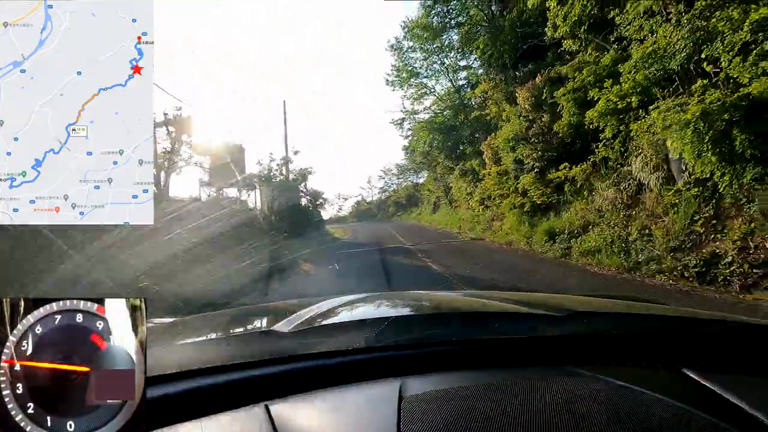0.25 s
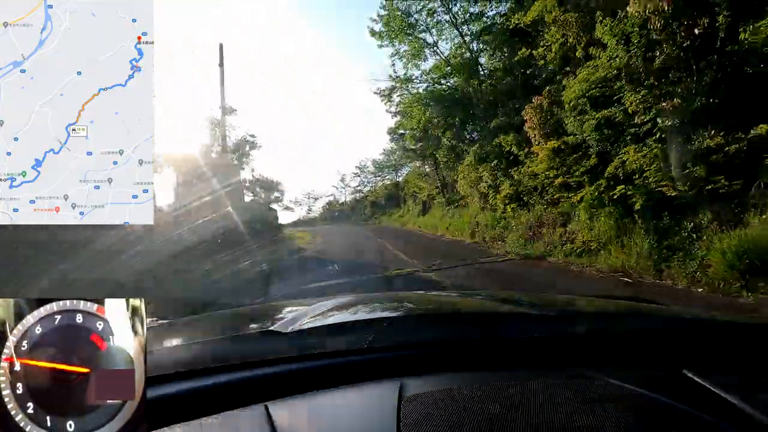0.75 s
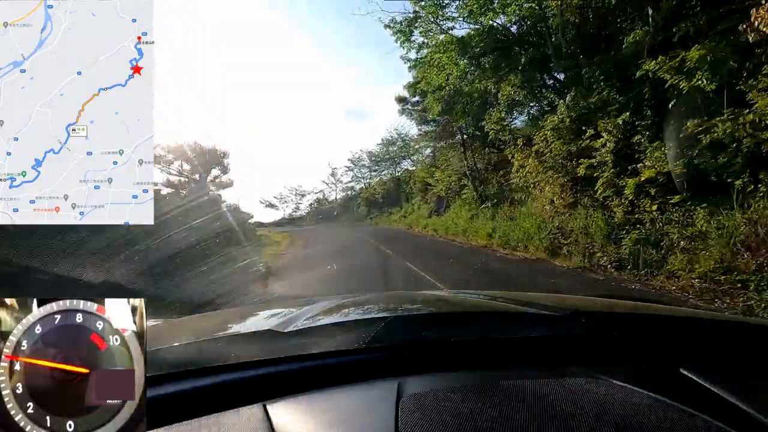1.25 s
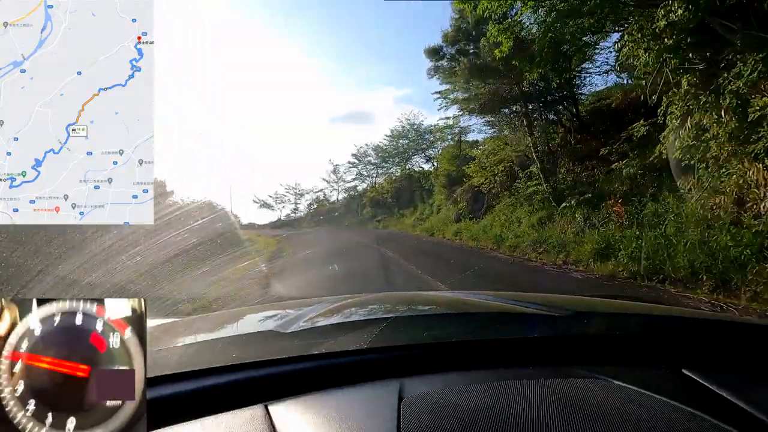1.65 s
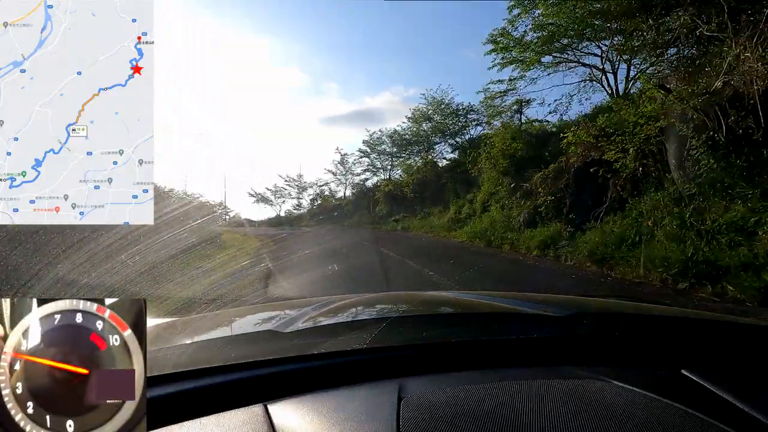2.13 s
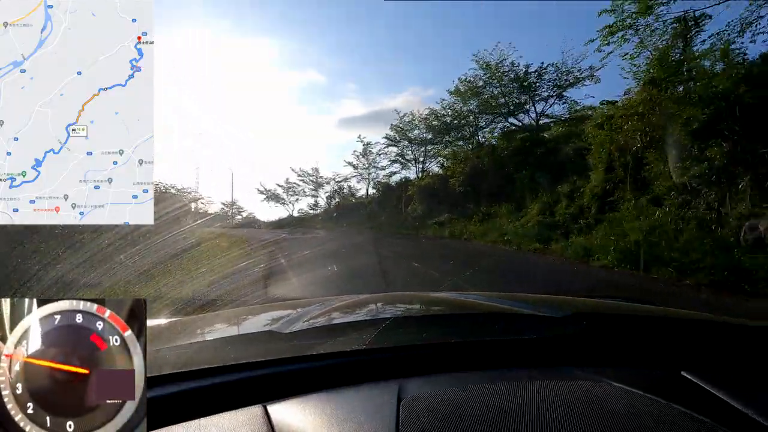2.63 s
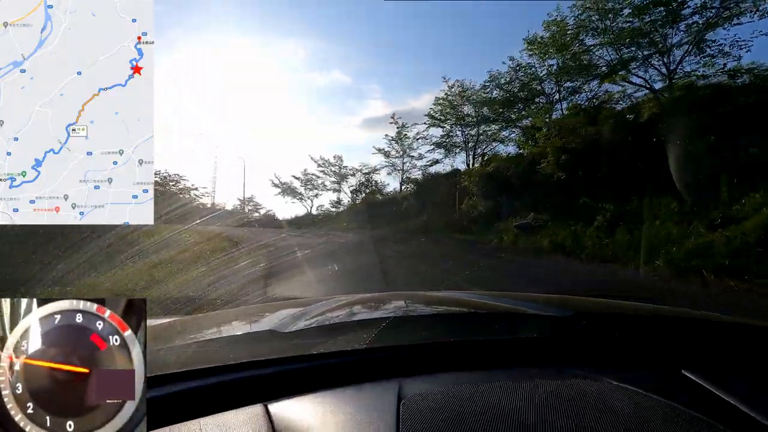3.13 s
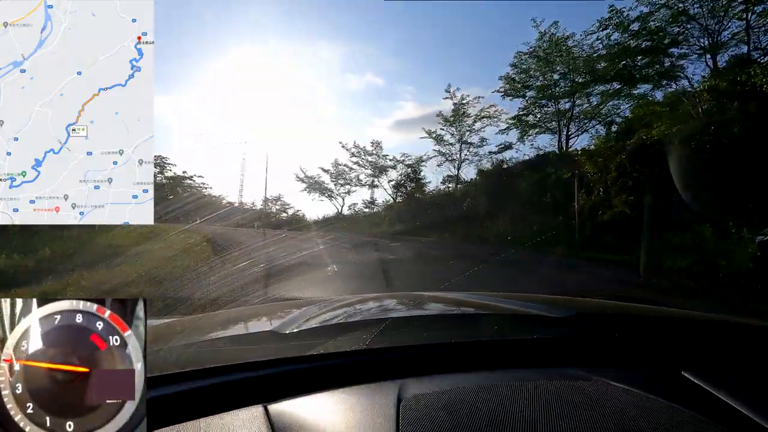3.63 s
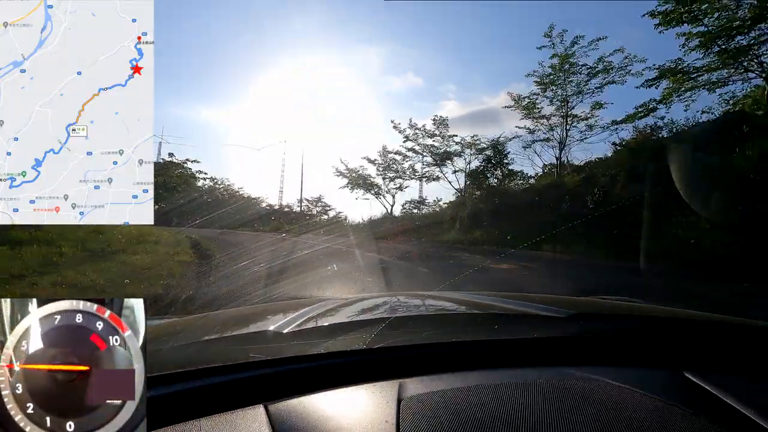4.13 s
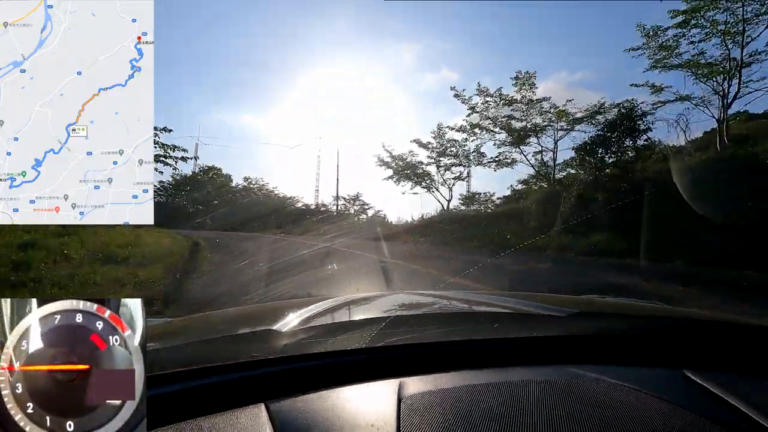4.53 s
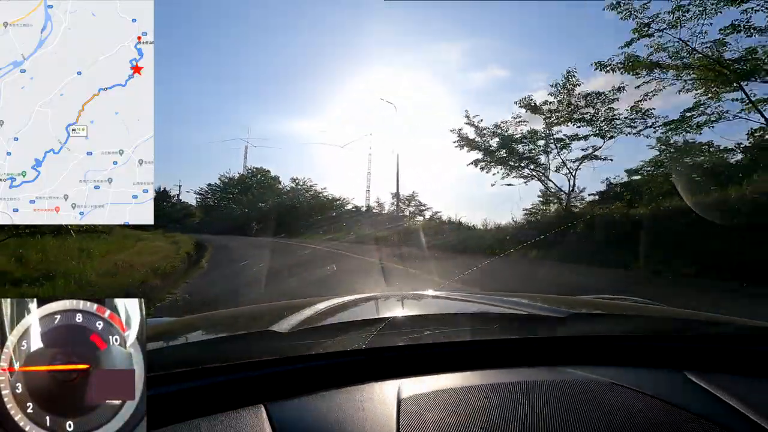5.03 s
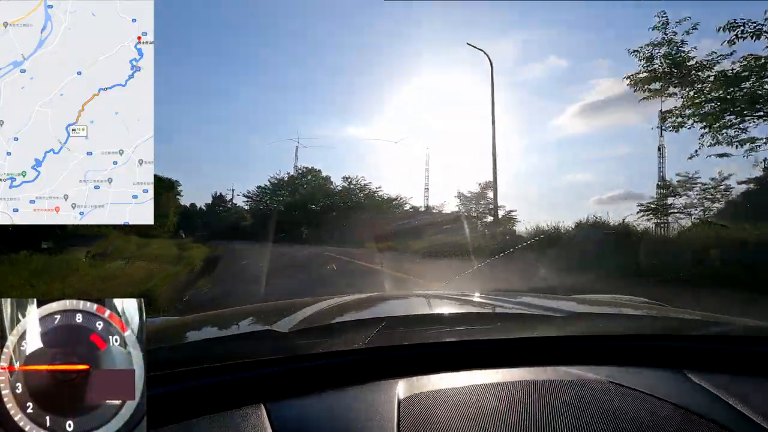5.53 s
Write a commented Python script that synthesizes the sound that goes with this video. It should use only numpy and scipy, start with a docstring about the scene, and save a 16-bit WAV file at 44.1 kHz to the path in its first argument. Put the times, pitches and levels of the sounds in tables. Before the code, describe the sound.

Inside a car on a bumpy road, a raspy engine pulls, backs off and pulls again, with road rumble, plastic knocks and small clinks.

```python
"""Inside a sports car with a twin-rotor engine, climbing a bumpy mountain road.
The driver pulls, eases off for a bend and pulls again from lower revs. Two firings per shaft turn
give an exhaust drone, a series of shaft orders and a pulsed rasp, all following the engine load.
The road excites tyre roar, rumble and the air modes of the cabin and tyres, while loose things
buzz, knock, clink and slide, the struck ones ringing in their own damped modes."""
import sys
import numpy as np
from scipy import signal
from scipy.fft import rfft, irfft
from scipy.io import wavfile
from scipy.ndimage import uniform_filter1d, minimum_filter1d

SR = 44100
rng = np.random.default_rng(int(sys.argv[2]) if len(sys.argv) > 2 else 0)


def int16_out(signal):
    """Quantize to a 16-bit WAV file."""
    q = np.round(np.clip(np.atleast_2d(signal).T, -1, 1) * 32767)
    wavfile.write(sys.argv[1], SR, q.astype(np.int16))


N = 254898
TIME = np.arange(N) / SR
LOW_REVS_HZ, HIGH_REVS_HZ, NEAR_TOP_HZ, TOP_REVS_HZ = 61.5, 65.5, 67.7, 69.7  # shaft speeds
BAND_LIMIT_HZ = 15900

# Rotation of the eccentric shaft. Each row: time in seconds, speed in turns per second.
SHAFT_SPEED = [(0, 64.95), (.65, 67.1), (1.56, 69.9), (1.69, 71.85), (1.82, 69.1), (1.94, 70.55),
               (2.08, 69.8), (2.25, 69.65), (2.8, 67.6), (3.25, 66.7), (3.9, 62.5), (4.32, 61.5),
               (4.45, 59.1), (4.6, 60.4), (4.75, 58.7), (4.96, 60.45), (5.08, 59.55), (5.26, 60.55),
               (5.78, 62.1)]
# The driver's demand. Each row: time in seconds, engine load in dB (0 is pulling hard).
ENGINE_LOAD = [(0, -0.5), (1.6, -1), (2.05, -3.5), (2.42, -9.5), (2.72, -4.5), (3.2, -3), (3.75, -14),
               (4.28, -15.5), (4.66, -3), (4.95, -1.5), (5.33, -0.5), (5.78, -1)]
# Shaft orders. Each entry: frequency as a multiple of shaft speed.
ORDERS = [6, 8, 9, 10, 11, 12, 13, 14, 15, 16, 17, 19, 20, 21, 22, 23, 24, 25, 26, 32]
# Their spectra at high revs, on part throttle and at low revs. Each entry: one order's level in dB.
HIGH_REVS_DB = [-37.5, -41, -36, -47, -35, -32.5, -37.5, -36, -34.5, -44, -38.5, -37.5, -46, -33.5, -39.5,
                -33.5, -46, -60, -60, -52]
PART_THROTTLE_DB = [-30, -44, -28.5, -38, -31, -30.5, -37, -42, -31, -46, -45, -34, -43, -32.5, -38, -42,
                    -45, -60, -60, -53.5]
LOW_REVS_DB = [-40, -33, -47, -22.5, -38, -32, -35.5, -38, -36.5, -36, -35.5, -40, -41, -32.5, -38.5, -33,
               -36.5, -38, -39.5, -53]
# Near top revs the orders slide onto or off cabin resonances. Each entry: one order's change in dB.
TOP_SHIFT_DB = [4, 6, 0, 0, 1, -3.5, -1, 1, -5, -1, 2, 4, 0, -2, -3, -2, -5, 0, 0, 3]
# Spectra of exhaust puffs at high and low revs, intake air, suspension rumble and tyre roar.
# Each row: frequency in Hz, relative spectral density in dB.
PUFFS_HIGH = [(150, 1), (400, -4.5), (550, -6), (700, -2), (900, 5), (1150, -4.5), (1430, 1.5), (1650, -17),
              (2500, -15), (5000, -43.5), (16000, -70.5)]
PUFFS_LOW = [(150, 3), (400, -7), (550, -12), (760, -11), (980, -0.5), (1130, -1.5), (1380, 2.5),
             (1620, -2.5), (1800, -10), (2500, -13.5), (5000, -43.5), (16000, -69.5)]
INTAKE_RUSH = [(400, -9.5), (1000, -0.5), (1500, 3.5), (1800, 4.5), (2300, 1.5), (3000, -4), (4000, -11.5),
               (4700, -18), (6300, -19.5), (9500, -34), (16000, -50)]
RUMBLE = [(6, -50), (15, -26), (24, -10.5), (38, 6), (54, 3.5), (78, 1.5), (100, 2), (125, 5), (160, -4.5),
          (240, -5), (350, -34), (700, -55), (3000, -110)]
TYRE_ROAR = [(80, -9.5), (150, -4.5), (200, -4.5), (245, -1), (300, -1.5), (370, -11), (500, -11),
             (700, -12), (950, -14), (1400, -21), (1900, -28), (2800, -32.5), (4700, -46.5), (8000, -56),
             (16000, -76)]
# Roughness of the asphalt, worst in the bend. Each row: time in seconds, road shake in dB.
ROAD_SHAKE = [(0, -14.5), (.9, -16), (1.35, -14.5), (2, -16.5), (3, -13), (3.5, -11.5), (4.02, -11),
              (4.28, -16.5), (4.45, -12), (4.9, -18.5), (5.45, -17), (5.78, -19)]
# Narrow resonances of the trim. Each row: frequency in Hz, filter width in Hz, rms level in dB.
TRIM_MODES = [(943, 87, -39), (2750, 28, -51), (3975, 250, -58), (6150, 360, -68.5)]
# The buzz of loose bits. Each row: frequency in Hz, relative spectral density in dB.
BUZZ_SPECTRUM = [(3000, -26), (6000, -1), (9000, 2.5), (13000, -2), (16000, -4.5)]
# Hollow plastic knocks and snaps of a catch. Each row: start in seconds, level in dB, pitch factor.
KNOCKS = [(.0398, -2.5, 1), (.1718, 2, 0.97), (.765, -11, 1.6), (1.513, -8.5, 1.1), (2.008, -1.5, .92),
          (2.632, -14, 1.2)]
SNAPS = [(.9326, -10.5, 1), (1.7505, -29, 0.98), (2.9885, -24, 1.05)]
# Modes of the plastic part, the catch and a small hard object.
# Each row: frequency in Hz, relative level in dB, time to decay by 60 dB in seconds.
PLASTIC_MODES = [(680, -12, 0.02), (945, -2, 0.032), (1125, -1, 0.016), (1362, -7, 0.03), (2170, -16, .01),
                 (2900, -15, 0.009), (3630, -19, .008), (4230, -24.5, .008)]
CATCH_MODES = [(3400, -7.5, 0.011), (3900, -8.5, .009), (5640, -3, .0035), (7400, -5, 0.0036),
               (8600, -5, .0035), (12000, -11, .002)]
HARD_OBJECT_MODES = [(2500, -6, .018), (3130, -3, .035), (3510, 0, .025), (3800, 1, .015), (4230, 2, .03),
                     (6350, -12, .025), (6934, -17, .05), (8150, -26, .06)]
# Small things clinking; the row at 0.172 s is the sharp crack that opens the knock there. Each row: start in
# seconds, level in dB, band centre in Hz, half width in octaves, time to decay by 60 dB in seconds.
CLINKS = [(.143, -45, 8000, 0.557, .089), (.172, -25, 3600, 0.7, 0.012), (.631, -41, 7480, 0.41, .12),
          (.709, -36, 12010, 1, 0.1236), (0.8915, -36, 12980, 0.27, .077), (0.9318, -25, 5500, 0.73, 0.026),
          (1.5585, -26, 5700, .35, .02), (1.720, -41, 9500, .6, 0.05), (2.67, -53, 8000, .7, .1),
          (2.872, -43, 10000, 0.797, 0.1157), (2.9855, -30, 6200, 0.63, 0.033),
          (3.335, -36, 3750, 0.18, 0.21), (3.334, -36.5, 7140, 0.29, 0.26), (3.3335, -39, 12000, .4, 0.14),
          (3.448, -35, 2800, .35, .16), (3.617, -31, 2000, .45, .09), (3.7519, -42, 9000, 0.569, .035),
          (4.1359, -48, 7087, .7, 0.086), (4.3, -44, 3700, 0.27, 0.33), (4.4545, -39.5, 5000, 0.38, .039)]
# Bumps set the cabin booming; ridges in the bend set the air in the tyres humming.
# Each row: start in seconds, length in seconds, level in dB, frequency in Hz.
CABIN_BOOMS = [(.18, 0.14, -16, 59.8), (.9, 0.1, -15, 52), (1.37, 0.15, -14, 35), (1.595, .18, -11.5, 62),
               (3.58, 0.059, -8, 48), (3.69, 0.098, -12.5, 54), (3.795, 0.2, -8, 62.7),
               (4.015, 0.17, -5.5, 60.1), (4.14, 0.081, -12, 37.9), (4.395, 0.052, -10.5, 56),
               (4.61, 0.067, -12, 58.3), (5.24, 0.29, -20, 56)]
TYRE_HUMS = [(2.82, 0.096, -18.5, 202), (3.07, 0.11, -19, 252), (3.35, .15, -20.5, 236),
             (3.55, 0.096, -15.5, 236), (3.92, 0.09, -19.5, 245)]
# A scrape as it starts and as it ends. Each row: frequency in Hz, relative spectral density in dB.
SCRAPE_START = [(1500, 2), (3300, 7), (4200, 6), (4900, -3), (6500, -5), (9700, -19), (10600, -24),
                (16000, -25)]
SCRAPE_END = [(1500, 3.5), (3900, 3.5), (5000, -9), (6800, -3.5), (9900, -7.5), (10500, -19), (12500, -17),
              (16000, -24)]
# The hard object lands. Each row: start in seconds, level in dB.
LANDINGS = [(1.5583, -21), (3.336, -25.5)]


def amp(db):
    """Amplitude ratio for a level in decibels."""
    return 10 ** (np.asarray(db) / 20)


def unit(x):
    """Normalisation to rms 1."""
    return x / np.sqrt(np.mean(x ** 2) + 1e-20)


def curve(rows):
    """Linear interpolation of a time table at every sample."""
    return np.interp(TIME, *np.transpose(rows))


def colour(x, spectrum):
    """Filtering in the frequency domain, normalised to rms 1."""
    hz, db = np.transpose(spectrum)
    f = np.fft.rfftfreq(len(x), 1 / SR)
    gain = amp(np.interp(np.log(f + 1), np.log(hz), db))
    return unit(irfft(rfft(x) * gain, len(x)))


def noise(spectrum):
    """Gaussian noise shaped to a spectrum."""
    return colour(rng.standard_normal(N), spectrum)


def wander(rate_hz):
    """Random modulation: low-pass noise of rms 1."""
    f = np.fft.rfftfreq(N, 1 / SR)
    return unit(irfft(rfft(rng.standard_normal(N)) * np.exp(-.5 * (f / rate_hz) ** 2), N))


def add(mix, start_s, sound):
    """Superposition of a sound from a given time on."""
    part = mix[max(round(start_s * SR), 0):][:len(sound)]
    part += sound[:len(part)]


def share(speed, from_hz, to_hz):
    """Linear crossfade weight, 0 to 1 between two shaft speeds."""
    return np.clip((speed - from_hz) / (to_hz - from_hz), 0, 1)


def resonance_db(hz, centre_hz, width_hz):
    """Response of a damped resonator, 0 dB at its centre."""
    return -10 * np.log10(1 + (2 * (hz - centre_hz) / width_hz) ** 2)


def partial(turns, order, db, flutter_db, odd_phase=1.28):
    """A harmonic of the shaft rotation, modulated in phase and level as combustion varies."""
    scatter, flutter = .22 * wander(12), wander(12)
    phase = odd_phase * (order % 2) + scatter
    return np.sqrt(2) * amp(db + flutter_db * flutter) * np.cos(2 * np.pi * order * turns + phase)


def exhaust_drone(turns, speed, load_db, cabin_mode_hz=240.7):
    """Periodic firing gives a tone and its octave, which resonates with a cabin air mode at low revs."""
    firing_db = -12 + 1.38 * load_db
    octave_db = -13 + .78 * load_db + 2 * resonance_db(4 * speed, cabin_mode_hz, width_hz=38.3)
    firing_angle = 2 * np.pi * 2 * turns
    firing = amp(firing_db + .7 * wander(24)) * np.cos(firing_angle)
    octave = amp(octave_db + wander(19)) * np.cos(2 * firing_angle)
    return -np.sqrt(2) * (firing + octave)  # a sharp suction trough and a broad crest each firing


def shaft_orders(turns, speed, load_db):
    """Phase-locked harmonics sum to a bark at each firing; unequal rotors give the odd orders."""
    high, top = share(speed, LOW_REVS_HZ, HIGH_REVS_HZ), share(speed, NEAR_TOP_HZ, TOP_REVS_HZ)
    eased = np.clip(-load_db / 3.1, 0, 1) * np.clip(2 * high, 0, 1)
    out = np.zeros(N)
    rows = zip(ORDERS, HIGH_REVS_DB, PART_THROTTLE_DB, LOW_REVS_DB, TOP_SHIFT_DB)
    for order, high_db, part_db, low_db, shift_db in rows:
        pulling_db = high * high_db + (1 - high) * low_db
        db = (1 - eased) * pulling_db + eased * part_db + top * shift_db + 1.27 * load_db
        out += partial(turns, order, db, flutter_db=1.1)
    return out


def accessory_whine(turns, speed, load_db, order=46, trim_hz=2752):
    """Swept resonance: a belt-driven accessory's tone swells as it crosses a trim mode at low revs."""
    db = -36.5 + 1.5 * load_db + 2 * resonance_db(order * speed, trim_hz, width_hz=62)
    return partial(turns, order, db, flutter_db=2.6)


def gas_rasp(turns, speed, load_db, puffs_db=-26.6, rush_db=-28.5, uneven=.22):
    """Amplitude-modulated flow noise: a puff at each port opening, over the steadier intake rush."""
    angle = 2 * np.pi * turns
    opening = np.exp(.45 * np.cos(2 * angle) + .3 * np.cos(4 * angle))
    gas = rng.standard_normal((2, N)) * opening * (1 + uneven * np.cos(angle)) * amp(wander(22))
    high = share(speed, LOW_REVS_HZ, HIGH_REVS_HZ)
    puffs = np.sqrt(high) * colour(gas[0], PUFFS_HIGH) + np.sqrt(1 - high) * colour(gas[1], PUFFS_LOW)
    rush = noise(INTAKE_RUSH) * opening ** .088 * amp(.9 * wander(42))
    return amp(puffs_db + .71 * load_db) * puffs + amp(rush_db + 1.59 * load_db) * rush


def road(boom_hz=61.7, boom_re_shake_db=-9.5, roar_db=-19.5):
    """Forced vibration: rough asphalt drives the suspension, the cabin's lowest air mode and the tyres."""
    shake_db = curve(ROAD_SHAKE)
    rumble = amp(shake_db) * noise(RUMBLE)
    cycles = np.cumsum(boom_hz + 3.6 * wander(8.4)) / SR  # random jolts keep shifting the boom
    boom_db = shake_db + boom_re_shake_db + 2.2 * wander(3.2)
    boom = np.sqrt(2) * amp(boom_db) * np.sin(2 * np.pi * cycles)
    roar = amp(roar_db + .39 * (shake_db - shake_db.mean()) + .95 * wander(28)) * noise(TYRE_ROAR)
    return rumble + boom + roar


def glass_reflections(x, notch_hz=778, width_hz=90, depth=.62):
    """Destructive interference: reflections off the glass weaken one narrow band."""
    b, a = signal.iirpeak(notch_hz, notch_hz / width_hz, fs=SR)
    return x - depth * signal.lfilter(b, a, x)


def trim_ring():
    """Broadband excitation keeps narrow resonances of the trim singing faintly."""
    out = np.zeros(N)
    for hz, width_hz, db in TRIM_MODES:
        b, a = signal.iirpeak(hz, hz / width_hz, fs=SR)
        band = signal.lfilter(b, a, rng.standard_normal(N))
        out += amp(db) * unit(signal.lfilter(b, a, band))
    return out


def loose_buzz(speed, load_db, contacts_per_s=2500, t60=.025, settle_s=.35):
    """Incoherent summation: loose bits shake with the engine, and their tiny contacts add in power."""
    settling_db = 12 * np.exp(-TIME / settle_s)  # they shake harder at first
    db = -62.5 + 1.4 * load_db - .1 * (speed - HIGH_REVS_HZ) + settling_db
    contacts = (rng.random(N) < contacts_per_s / SR) * rng.standard_normal(N)
    decay = amp(-60 * TIME[:SR // 20] / t60)
    power = signal.oaconvolve(contacts ** 2, decay ** 2)[:N]
    return amp(db) * colour(np.sqrt(abs(power)) * rng.standard_normal(N), BUZZ_SPECTRUM)


def strikes(rows, modes, onset_s):
    """Modal superposition: each impact excites a set of exponentially decaying sinusoids."""
    out, t = np.zeros(N), TIME[:SR // 8]
    onset = 1 - np.exp(-t / onset_s)
    for start_s, db, pitch in rows:
        ring = sum(amp(mode_db - 60 * t / t60) * np.sin(2 * np.pi * hz * pitch * t)
                   for hz, mode_db, t60 in modes)
        add(out, start_s, -amp(db) * ring * onset)
    return out


def plastic_knocks():
    """Heavy damping: a plastic part taps the trim and rings only briefly."""
    return strikes(KNOCKS, PLASTIC_MODES, onset_s=.00034)


def clinks(mode_count=70, ring_db=-14, ring_stretch=2.4):
    """A quick chatter of contacts gives a noise burst; free vibration leaves a faint metallic ring."""
    out, t = np.zeros(N), TIME[:SR // 4]
    grid_hz = np.geomspace(300, SR / 2, num=40)
    onset = 1 - np.exp(-t / .0012)
    for start_s, db, hz, octaves, t60 in CLINKS:
        band = np.transpose([grid_hz, -3 * (np.log2(grid_hz / hz) / octaves) ** 2])
        chatter = colour(rng.standard_normal(len(t)), band) * amp(-60 * t / t60)
        mode_hz = rng.uniform(0, BAND_LIMIT_HZ, mode_count)
        modes = np.sin(2 * np.pi * np.outer(mode_hz, t)).sum(0)
        ring = colour(modes, band) * amp(ring_db - 60 * t / (t60 * ring_stretch))
        add(out, start_s, amp(db) * (chatter + ring) * onset)
    return out


def jolted_air(rows, edge_s=.035, waver_hz=2.19, uneven_db=.8):
    """Cavity response: each jolt sets enclosed air oscillating; it builds, holds unevenly and dies."""
    out, drift_hz = np.zeros(N), waver_hz * wander(10.4)
    for start_s, length_s, db, hz in rows:
        ramp = np.clip(np.minimum(TIME - start_s, start_s + length_s - TIME) / edge_s, 0, 1)
        cycles = np.cumsum(hz + drift_hz) / SR + rng.random()
        out += amp(db) * np.sin(np.pi / 2 * ramp) * np.sin(2 * np.pi * cycles)
    return np.sqrt(2) * out * amp(uneven_db * wander(18))


def catch_snaps():
    """Impulsive excitation: a stiff catch snaps, ringing in high, short-lived modes."""
    return strikes(SNAPS, CATCH_MODES, onset_s=.00016)


def slide(start_s=1.534, rise_s=.003, hold_s=.082, level_db=-31, fade_db_per_s=250):
    """Sliding friction: something slips at a bump with a grainy scrape that brightens and fades."""
    t = TIME - start_s
    late = np.clip(t / hold_s, 0, 1)
    db = level_db - fade_db_per_s * np.maximum(t - hold_s, 0)
    scrape = np.sqrt(1 - late) * noise(SCRAPE_START) + np.sqrt(late) * noise(SCRAPE_END)
    return np.clip(t / rise_s, 0, 1) * amp(db + 1.2 * wander(150)) * scrape


def bounces(count=4, gap_s=.004, loss_db=5.0):
    """Inelastic collisions: a small hard object lands and rebounds, ringing less at each contact."""
    rows = []
    for start_s, db in LANDINGS:
        gaps, pitches = rng.uniform(.6, 1.4, count), rng.uniform(.985, 1.015, count)
        times = start_s + gap_s * (np.cumsum(gaps) - gaps[0])
        rows += zip(times, db - loss_db * np.arange(count), pitches)
    return strikes(rows, HARD_OBJECT_MODES, onset_s=.0003)


def scene():
    """Superposition of engine, road and rattles in the cabin, in one channel."""
    speed, load_db = curve(SHAFT_SPEED), curve(ENGINE_LOAD)
    turns = np.cumsum(speed) / SR
    engine = turns, speed, load_db
    tones = exhaust_drone(*engine) + shaft_orders(*engine) + accessory_whine(*engine)
    wash = gas_rasp(*engine) + road() + jolted_air(CABIN_BOOMS) + jolted_air(TYRE_HUMS)
    cabin = glass_reflections(wash) + trim_ring()
    rattles = plastic_knocks() + catch_snaps() + bounces() + clinks() + loose_buzz(speed, load_db)
    return (tones + cabin + rattles + slide())[None]


def record(dry):
    """Peak limiting to full scale, then short fades at the ends and a low-pass band limit."""
    gain = minimum_filter1d(1 / np.maximum(abs(dry), 1), size=81)
    gain = uniform_filter1d(uniform_filter1d(gain, size=41), size=41)
    limited = dry * gain * signal.windows.tukey(N, .001)
    low_pass = signal.cheby1(14, .02, BAND_LIMIT_HZ, fs=SR, output="sos")
    return signal.sosfiltfilt(low_pass, limited, padlen=2000)


dry = scene()
out = record(dry)
int16_out(out)
```